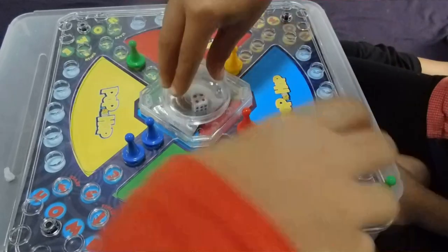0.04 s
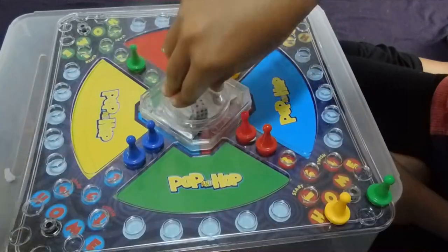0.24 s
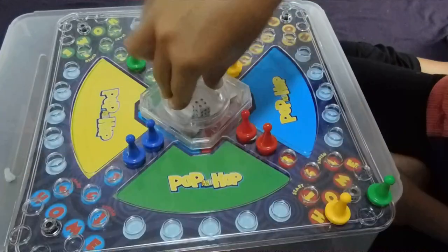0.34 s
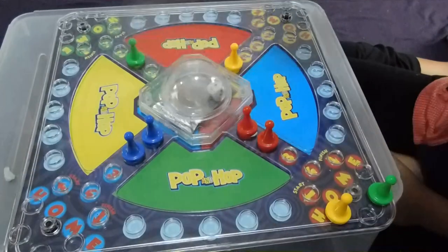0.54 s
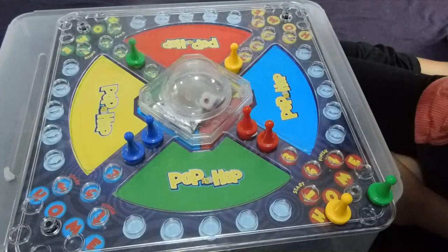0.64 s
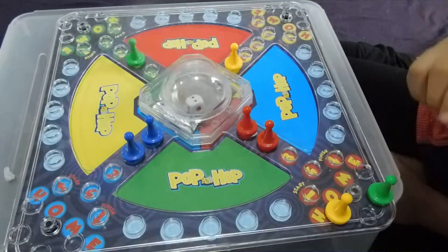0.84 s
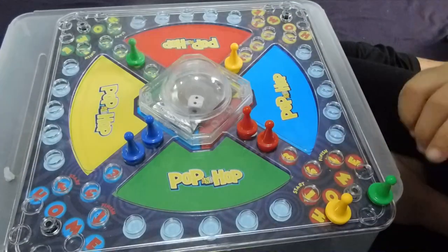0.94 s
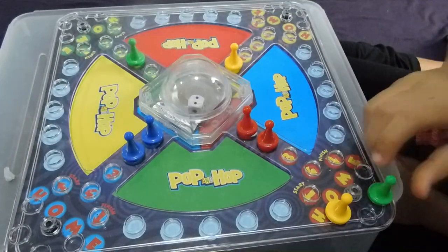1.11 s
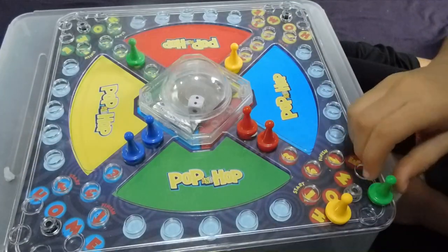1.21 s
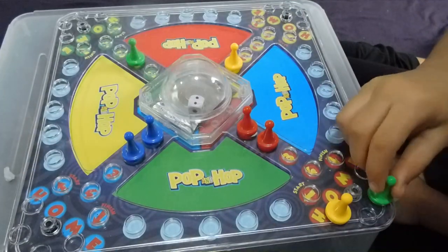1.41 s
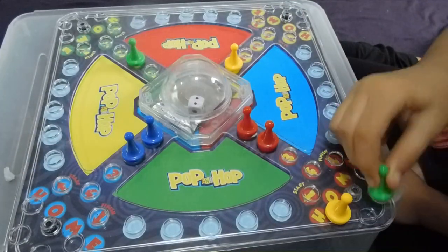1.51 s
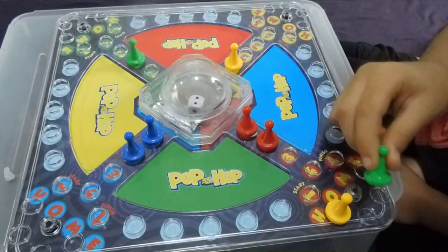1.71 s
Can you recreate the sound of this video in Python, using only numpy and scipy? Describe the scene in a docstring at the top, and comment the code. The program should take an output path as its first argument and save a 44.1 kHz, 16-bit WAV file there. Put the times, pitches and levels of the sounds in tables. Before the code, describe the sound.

A sprung plastic dice dome on a board game is pressed: two loud, sharp pops with rattling buzz, then die bounces and soft hollow knocks settling, and a light pawn click; small quiet room, close microphone.

```python
"""Soft hollow knocks and a finger's rub open the scene; two loud pops follow as a hand presses the die dome
of a plastic game board and its spring goes down and up. The sprung plate buzzes as dense ticks ringing its
resonances; hard clicks (excited shell modes), light before the pops, turn to rattle ticks and die bounces,
and the die rocks to rest in soft knocks (a decaying hollow note). Later a pawn is touched and lifted, with
lighter clicks. Decaying low noise gives overload rumble under the loud pops and hits and faint thuds elsewhere;
a faint hum rises, and a short reverberant tail and shaped noise make the small quiet room, heard close up."""
import sys
import numpy as np
from scipy import signal
from scipy.fft import rfft, irfft
from scipy.io import wavfile

SR = 44100
rng = np.random.default_rng(int(sys.argv[2]) if len(sys.argv) > 2 else 0)


def ratio_of_db(decibels):
    """Turn decibels (scalar or array-like) into linear amplitude factors; 0 dB maps to 1."""
    return 10 ** (np.asarray(decibels, float) / 20)


def bounce(signal):
    """Save signal as a 16-bit WAV file at the path given by the first command-line argument."""
    frames = np.transpose(np.atleast_2d(signal))
    limited = np.clip(frames, -1, 1)
    pcm = np.round(limited * 32767).astype(np.int16)
    wavfile.write(sys.argv[1], SR, pcm)


N = 77175  # length [samples]


def evened(x):
    """Normalization to unit root-mean-square amplitude."""
    return x / np.sqrt(np.mean(x ** 2) + 1e-20)


def read(points, hz):
    """Interpolation of a spectral curve over logarithmic frequency."""
    f, value = np.transpose(points)
    return np.interp(np.log(hz + 1), np.log(f + 1), value)


def add(mix, s, sound):
    """Superposition of a sound on the mix from time s [s], in place."""
    part = mix[:, max(round(s * SR), 0):][:, :sound.shape[-1]]
    part += sound[..., :part.shape[1]]


def along(rows, column=1):
    """Amplitude envelope interpolated in dB from a level column, silent outside the table."""
    rows, t = np.array(rows), np.arange(N) / SR
    return ratio_of_db(np.interp(t, rows[:, 0], rows[:, column], -150, -150))


def band(x, lo_hz, hi_hz):
    """Band-pass filtering by a Butterworth response."""
    return signal.sosfilt(signal.butter(2, [lo_hz, hi_hz], "band", fs=SR, output="sos"), x)


def colour(x, points):
    """Spectral shaping: each frequency component is scaled by a curve in dB."""
    n = x.shape[-1]
    return irfft(rfft(x) * ratio_of_db(read(points, np.fft.rfftfreq(n, 1 / SR))), n)


def resonate(x, hz, width):
    """Resonance of unit gain: heterodyne to zero, smooth with one pole, shift back; hz may glide."""
    turn = np.exp(2j * np.pi * np.cumsum(hz * np.ones(x.shape[-1])) / SR)
    r = np.exp(-np.pi * width / SR)
    return 2 * (turn * signal.lfilter([1 - r], [1, -r], x / turn)).real


def click(db, treble_db, centre_hz, pan_db, chatter_db):
    """Modal excitation: an impact and its chatter ring the shell modes near the contact pitch; treble cracks."""
    # Modes of the plastic shell, nominal before random spread: (frequency [Hz], level [dB], T60 [s])
    shell_modes = [(1150, -8, .014), (1600, -4, .012), (2100, 0, .014), (2400, 0, .012), (2780, -1, .012),
                   (3300, -3, .009), (4050, -4, .011), (5000, -9, .008)]
    level_spread_db, pitch_spread = 2, 0.057  # standard deviations; pitch as a fraction
    focus_db_per_octave = 4  # modes weaken away from the contact pitch
    chatter_t60_s, snap_t60_s, crack_t60_s = 0.064, 0.01, 0.1
    snap_db, crack_db = 3, 2
    t = np.arange(5000) / SR
    noise = rng.standard_normal((4, len(t)))
    impact = 1. * (t == 0)
    sparse = rng.random(len(t)) < 0.05
    shared_noise = noise[:2] + 0.5 * noise[1::-1]  # each channel leaks into the other
    drive = impact + ratio_of_db(chatter_db - 60 * t / chatter_t60_s) * shared_noise * sparse

    # The factor t60 compensates the bandwidth, so modes of equal level start equally strong.
    ring = ratio_of_db(snap_db) * resonate(impact, centre_hz, 2.2 / snap_t60_s) * snap_t60_s
    for hz, mode_db, t60 in shell_modes:
        mode_level = mode_db + level_spread_db * rng.standard_normal()
        mode_level -= focus_db_per_octave * abs(np.log2(hz / centre_hz))
        mode_hz = hz * (1 + pitch_spread * rng.standard_normal())
        ring = ring + ratio_of_db(mode_level) * resonate(drive, mode_hz, 2.2 / t60) * t60
    ring = band(ring * np.minimum(t / 0.00046, 1), 600, 6200)

    crack = evened(band(noise[2:], 4000, 13000)) * ratio_of_db(treble_db + crack_db - 60 * t / crack_t60_s)
    crack = crack * np.minimum(t / 0.0012, 1)
    pan = ratio_of_db([[pan_db / 2], [-pan_db / 2]])  # positive = louder on the left
    return ratio_of_db(db) * (ring / abs(ring).max() + crack) * pan


def clicks(rows, pan_db, chatter_db):
    """Superposition of independent impacts."""
    mix = np.zeros((2, N))
    for s, *row in rows:
        add(mix, s, click(*row, pan_db, chatter_db))
    return mix


def spring_pops():
    """Impulsive release: the spring plate strikes hard as it goes down and as it comes up."""
    # Pops: (time [s], level [dB], treble before the crack trim [dB re level], contact pitch [Hz])
    pop_rows = [(0.2096, 2, -17.5, 2300), (0.3951, -1, -13, 2750)]
    return clicks(pop_rows, pan_db=-2, chatter_db=-9)


def hard_clicks():
    """Impact excitation: hard clicks, light ones before the pops, then rattle ticks and die bounces."""
    # Clicks: (time [s], level [dB], treble before the crack trim [dB re level], contact pitch [Hz])
    click_rows = [(0.0148, -23.5, -26.5, 1840), (0.0987, -28.5, -39, 1650), (0.501, -19, -26, 2050),
                  (0.5122, -9, -14, 2080), (0.522, -16.5, -17.5, 3860), (0.5476, -12.5, -14, 2500),
                  (0.5623, -24, -27.5, 2400), (0.5869, -19.5, -22, 2300), (0.6336, -27.5, -17, 2160),
                  (0.7375, -19, -24, 2130), (0.7563, -42, -35, 2510), (0.8707, -29, -20, 2190),
                  (0.9214, -18, -14.5, 2420)]
    return clicks(click_rows, pan_db=-2, chatter_db=-9)


def buzz(levels, bands):
    """Dense random impulses: uneven ticks of the loose plate ring its own bands and the shell."""
    # Body spectrum of the buzz: (frequency [Hz], relative level per Hz [dB])
    body_curve = [(400, -20), (892, 4), (1400, -6), (3000, 0), (6940, 1), (12900, -15), (16000, -29.5)]
    ticks_per_s, uneven_db = 7600, 1.35
    present = rng.random(N) < ticks_per_s / SR
    strength = ratio_of_db(uneven_db * np.minimum(rng.exponential(1, N), 4))
    ticks = rng.standard_normal((3, N)) * strength * present
    ticks = 1.1 * ticks[0] + ticks[1:]  # one part common to both channels
    rung = sum(ratio_of_db(db) * evened(resonate(ticks, hz, width)) for hz, width, db in bands)
    body = evened(colour(ticks, body_curve)) + evened(rung)
    main, treble = band(body, 460, 6300), band(body, 4600, 17000)
    return evened(main) * along(levels, 1) + evened(treble) * along(levels, 2)


def plate_buzz():
    """Boundary conditions set the modes: the plate rings differently held down and after it springs up."""
    # Buzz after the pop down, then after the pop up: (time [s], level [dB], treble level [dB])
    down_levels = [(.212, -11, -13), (.226, -15, -21.5), (.29, -26, -31.5), (.355, -42.5, -48.5),
                   (.39, -30.5, -36)]
    up_levels = [(.397, -15, -16), (.432, -14, -17.5), (.456, -13, -15), (.476, -18, -20.5),
                 (.494, -23.5, -20.5), (.52, -19, -29.5), (.56, -28.5, -31.5), (.58, -36.5, -40),
                 (.72, -65.5, -74)]
    # Resonances of the plate held down, then up: (frequency [Hz], width [Hz], relative level [dB])
    pressed_bands = [(1670, 300, 6), (2240, 350, -3.5), (3094, 980, -0.5)]
    plate_bands = [(2390, 180, -4.5), (2720, 610, -9.5), (3810, 300, 0), (12500, 1400, -2.5)]
    return buzz(down_levels, pressed_bands) + buzz(up_levels, plate_bands)


def knock(db, hz):
    """Damped cavity oscillation: a soft blow swells and dies on the board's hollow note, a little rough."""
    rise_s, t60_s, trim_db = 0.0019, 0.067, 3
    t = np.arange(3000) / SR
    swell = (t / rise_s) ** 2 * np.exp(-2 * t / rise_s)
    tail = ratio_of_db(-13.5 - 60 * t / t60_s) * np.minimum(t / rise_s, 1)
    shape = swell + tail
    noise = rng.standard_normal((2, len(t)))
    rough = evened(resonate(resonate(noise, hz, 430), hz, 500))
    note = np.sin(2 * np.pi * hz * t) + 0.6 * rough
    return ratio_of_db(db + trim_db) * shape / shape.max() * note


def board_knocks():
    """Cavity excitation: soft knocks ring only the hollow board; the die rocks on one edge, then the other."""
    # Soft knocks: (time [s], level before the knock trim [dB], pitch [Hz])
    knock_rows = [(0.003, -29.5, 1285), (0.014, -29, 936), (0.086, -35, 796), (0.092, -37, 1153),
                  (0.105, -32.5, 977), (0.118, -31, 963), (0.2, -27.5, 1020), (0.3, -25, 927),
                  (0.332, -29, 990), (0.363, -32, 857), (0.502, -23.5, 948), (0.512, -21, 943),
                  (0.531, -23.5, 968), (0.547, -24, 957), (0.562, -29, 901), (0.585, -26, 995),
                  (0.639, -35.5, 1003), (0.651, -38.5, 1163), (0.699, -47.5, 983), (0.738, -33, 992),
                  (0.755, -39.5, 974), (0.77, -43.5, 882), (0.853, -46.5, 930), (0.859, -39, 1043),
                  (0.872, -34.5, 833), (0.89, -44.5, 815), (0.923, -29.5, 1012), (0.947, -37.5, 922),
                  (1.34, -50, 854), (1.5, -37, 1170), (1.516, -41, 900)]
    # Rocking to rest: (time [s], level before the knock trim [dB], gap to the second edge [s])
    rock_rows = [(0.968, -43.5, 0.012), (1.031, -43, .014), (1.098, -46.5, .011), (1.166, -50.5, 0.0091),
                 (1.227, -62.5, 0.00785)]
    rock_hz, second_edge_db = 984, -6.5
    mix = np.zeros((2, N))
    for s, *row in knock_rows:
        add(mix, s, knock(*row))
    for s, db, gap in rock_rows:
        add(mix, s, knock(db, rock_hz))
        add(mix, s + gap, knock(db + second_edge_db, rock_hz))
    return mix


def pawn_clicks():
    """Impact excitation: the pawn taps in its socket, with less chatter than the other clicks."""
    # Taps: (time [s], level [dB], treble before the crack trim [dB re level], contact pitch [Hz])
    pawn_rows = [(1.3393, -38, -40, 1850), (1.488, -49, -15, 4200), (1.5003, -17, -28, 3100),
                 (1.517, -29, -28.5, 2400), (1.531, -36, -24, 3400)]
    return clicks(pawn_rows, pan_db=1.5, chatter_db=-12)


def rub():
    """Friction noise: fingers on the smooth plastic dome give a hiss shaped by resonances."""
    # Loudness of the rub: (time [s], level of the unit-rms hiss [dB])
    rub_levels = [(0, -61), (.03, -80.5), (.08, -76.5), (.095, -52), (.19, -52), (.205, -34)]
    # Resonances of the hiss: (frequency [Hz], width [Hz], relative level [dB])
    hiss_bands = [(6130, 480, 1.5), (6933, 3300, 0), (1500, 3200, 6)]
    noise = rng.standard_normal((3, N))
    noise = noise[0] + 0.78 * noise[1:]
    hiss = sum(ratio_of_db(db) * evened(resonate(noise, hz, width)) for hz, width, db in hiss_bands)
    return along(rub_levels) * evened(hiss)


def rumble_burst(db, t60, low_hz):
    """Exponentially decaying band noise: low noise with a narrower low resonance in it."""
    low_note_hz, note_width_hz, note_db = 147.4, 45, -5.5
    t = np.arange(SR // 3) / SR
    noise = rng.standard_normal((2, len(t)))
    low = evened(band(noise, 30, 500))
    low = low + ratio_of_db(note_db) * evened(resonate(noise, low_note_hz, note_width_hz))
    low = band(band(low, low_hz, 2300), low_hz, 2300)
    return evened(low) * np.minimum(t / 0.0026, 1) * ratio_of_db(db - 60 * t / t60)


def low_rumble():
    """Superposition of low bursts: overload noise under the loud pops and hits, faint thuds elsewhere."""
    # Bursts: (time [s], level at the start of decay [dB], T60 [s], low band edge [Hz])
    rumble_rows = [(.003, -53, 0.25, 119), (0.094, -56, 0.3, 125), (0.209, -24, 0.17, 25.1),
                   (.209, -22.5, 0.063, 320), (0.397, -27.5, 0.21, 24.9), (0.439, -26, 0.19, 25.25),
                   (0.514, -24, 0.016, 25.8), (0.924, -48, 0.077, 287), (1.498, -47.5, 0.23, 178)]
    mix = np.zeros((2, N))
    for s, *row in rumble_rows:
        add(mix, s, rumble_burst(*row))
    return mix


def hum():
    """Narrow-band noise: a faint fuzzy note swells, rises in pitch and fades."""
    # (start [s], length [s], level before the swell [dB], first pitch [Hz], last pitch [Hz], width [Hz])
    rising_note = (.63, .15, -59, 480, 540, 15)
    start, length, db, from_hz, to_hz, width = rising_note
    u = np.arange(round(length * SR)) / (length * SR)
    hz = from_hz + (to_hz - from_hz) * u
    noise = rng.standard_normal(len(u))
    fuzzy = evened(resonate(resonate(noise, hz, width), hz, width))
    mix = np.zeros((2, N))
    add(mix, start, ratio_of_db(db) * np.sin(np.pi * u) * fuzzy)
    return mix


def room(x):
    """Reverberation: sparse reflections of random sign, each frequency decaying at its own rate."""
    # Decay of the room: (frequency [Hz], T60 [s])
    decay_times = [(300, 0.088), (1400, 0.34), (3700, 0.22), (9700, 0.27)]
    gap_s, spacing = 0.004, 20  # silence ahead of the tail [s], mean tap spacing [samples]
    taps = np.zeros((2, SR // 2))
    at = np.arange(0, SR // 2 - spacing, spacing)
    at = at + rng.integers(0, spacing, (2, len(at)))
    np.put_along_axis(taps, at, rng.choice([-1., 1.], at.shape), 1)
    hz, t, z = signal.stft(taps, SR, nperseg=256)
    decay = ratio_of_db(-60 * t / read(decay_times, hz)[:, None])
    tail = signal.istft(z * decay, SR, nperseg=256)[1]
    tail = np.pad(tail, ((0, 0), (round(gap_s * SR), 0)))
    tail = tail / np.linalg.norm(tail[0])
    return signal.fftconvolve(x.mean(0)[None], tail, axes=1)[:, :N]


def floor():
    """Partial coherence: the air of the room is shaped noise, partly alike in both channels."""
    # Spectrum of the air: (frequency [Hz], relative level per Hz [dB])
    air_curve = [(30, -36), (311, -16), (821, -10.5), (1280, -8), (16000, -39)]
    # Loudness of the air: (time [s], level of the unit-rms noise [dB])
    air_levels = [(0, -46.5), (1.002, -60.5), (1.45, -61), (1.75, -59)]
    # Likeness of the channels: (frequency [Hz], left-right correlation [0..1])
    likeness = [(60, .3), (500, 0.74), (2000, 0.28), (15000, 0.088)]
    z = rfft(rng.standard_normal((2, N)))
    same = read(likeness, np.fft.rfftfreq(N, 1 / SR))
    right = same * z[0] + np.sqrt(1 - same ** 2) * z[1]
    air = colour(irfft([z[0], right], N), air_curve)
    s, db = np.transpose(air_levels)
    return evened(air) * ratio_of_db(np.interp(np.arange(N) / SR, s, db))


def scene():
    """Superposition of direct sound, reverberation, and the rumble and air, which excite no tail."""
    room_db, knock_room_db = -9.5, -5  # tail level; extra on the knocks' send to the room
    game = spring_pops() + hard_clicks() + plate_buzz() + pawn_clicks() + rub() + hum()
    board = board_knocks()
    tail = ratio_of_db(room_db) * room(game + ratio_of_db(knock_room_db) * board)
    return game + board + tail + low_rumble() + floor()


def top_cut(x):
    """Nothing passes above the cut-off."""
    return signal.sosfilt(signal.butter(12, 16110, fs=SR, output="sos"), x)


def record(dry):
    """Saturation and band limiting: peaks clip at full scale, then a low-pass removes the top."""
    clipped = np.clip(dry, -1, 1)
    low_pass = signal.firwin(255, 15900, window=("kaiser", 8), fs=SR)
    limited = signal.oaconvolve(clipped, low_pass[None], "same", axes=1)
    return top_cut(limited)


dry = scene()
out = record(dry)
bounce(out)
```